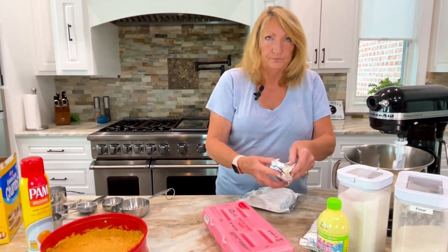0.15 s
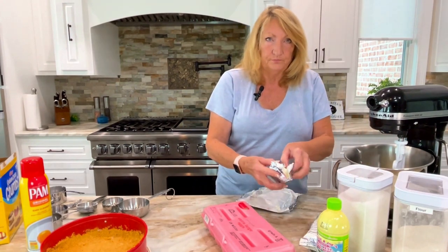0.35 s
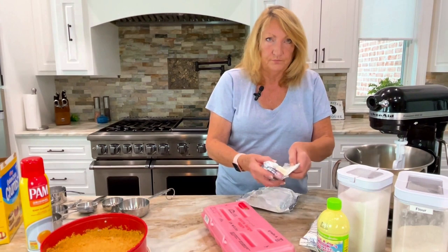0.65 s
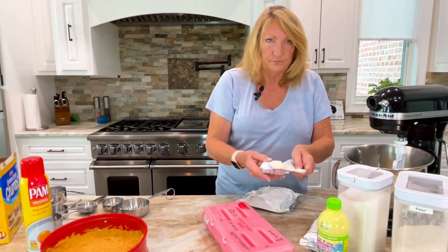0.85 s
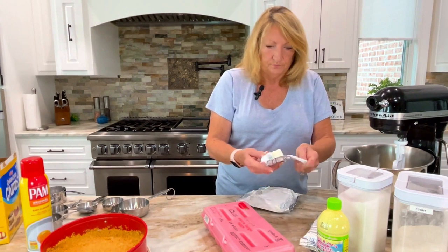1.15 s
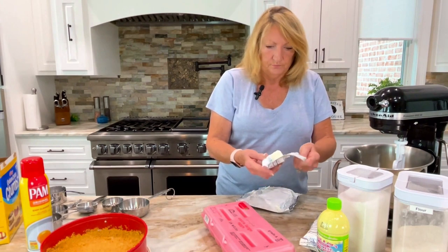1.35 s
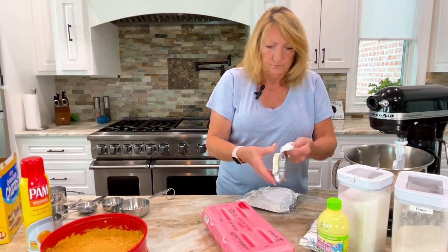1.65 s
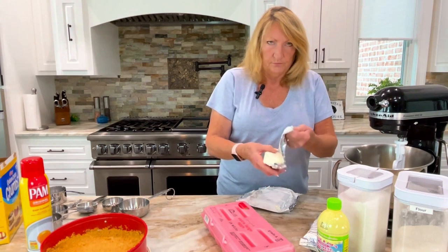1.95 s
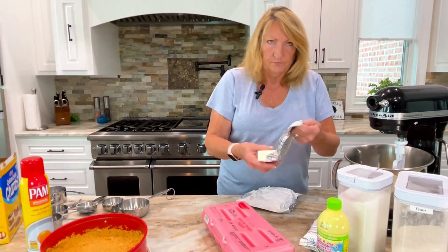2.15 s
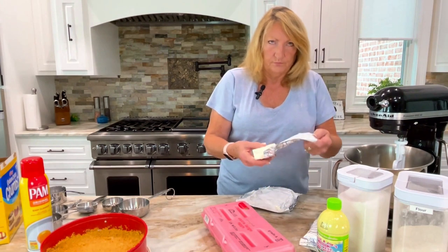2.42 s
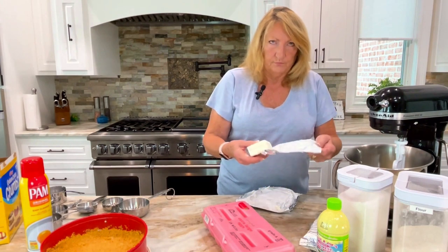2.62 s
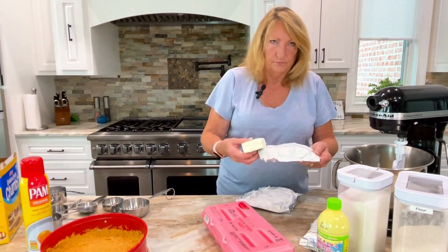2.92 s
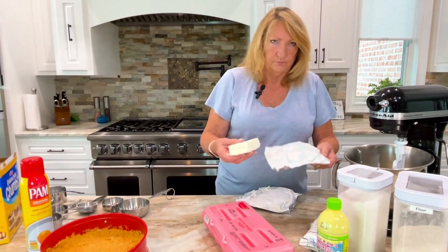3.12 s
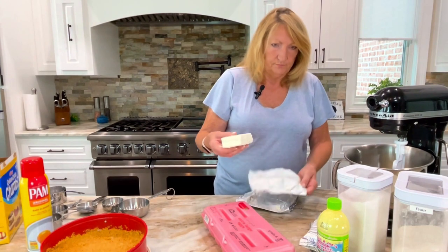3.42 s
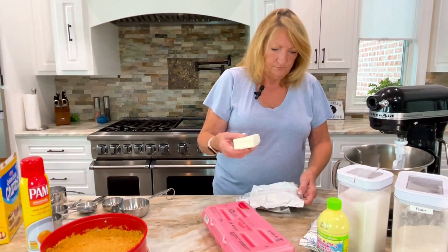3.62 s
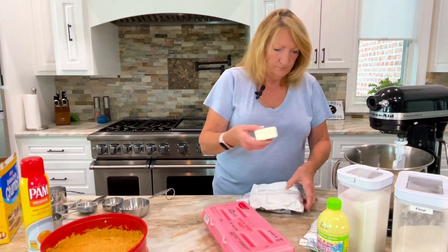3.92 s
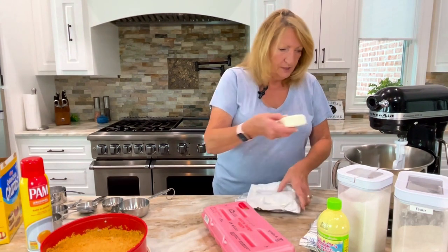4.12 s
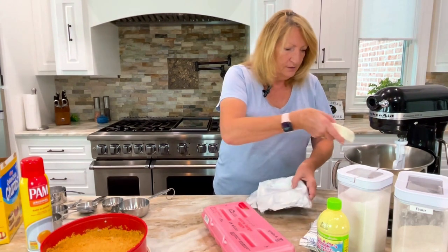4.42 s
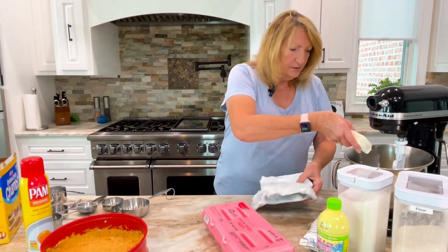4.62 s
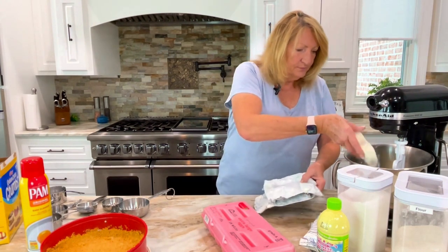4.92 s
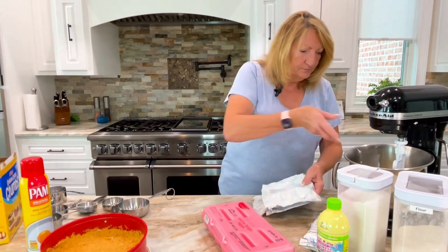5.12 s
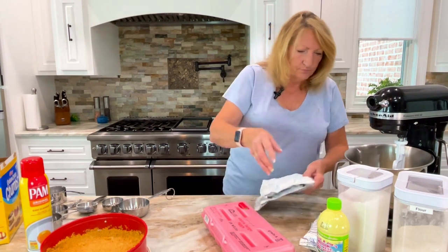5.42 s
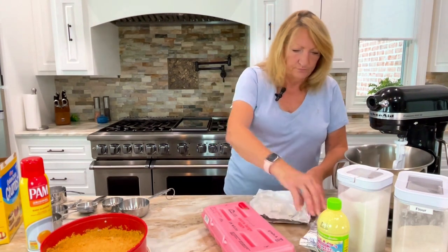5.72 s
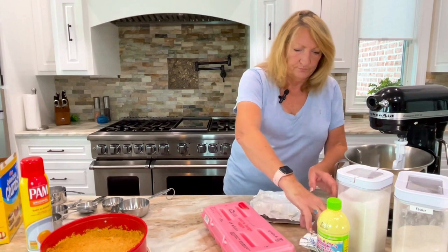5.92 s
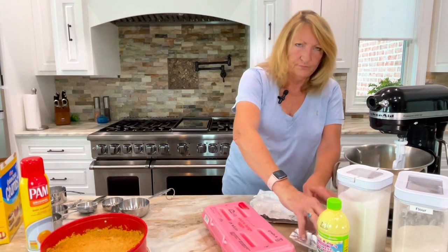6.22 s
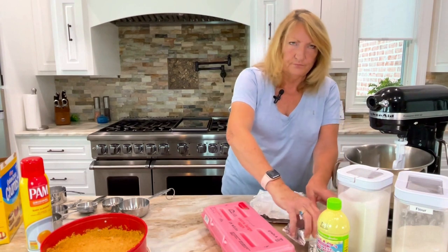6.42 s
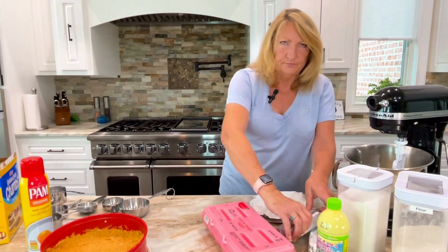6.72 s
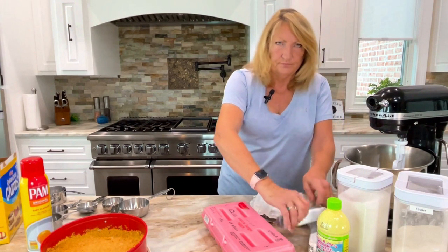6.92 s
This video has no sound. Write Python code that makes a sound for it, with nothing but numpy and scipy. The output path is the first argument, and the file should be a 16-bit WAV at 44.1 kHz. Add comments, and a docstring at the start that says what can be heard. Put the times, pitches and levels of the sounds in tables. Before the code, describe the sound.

Foil wrapper crinkles and snaps as it is peeled off a butter block, pressed onto a counter, then a second wrapped block is picked at.

```python
"""A foil wrapper is peeled off a block of butter in a quiet kitchen: the sheet buckles in distinct snaps, bursts
of filtered noise, while each stroke of the hands raises a rustle of tiny creases. Scrapes are gliding narrow-band
noise; popping facets and soft bumps are damped tones. The foil is pressed onto the counter, the butter drops
into a bowl as a decaying noise slap, then fingers pick at a second, tightly wrapped block.
Behind it lie a short diffuse reverberation, still air and a faint mains hum."""
import sys
import numpy as np
from scipy import signal
from scipy.fft import rfft, irfft, next_fast_len
from scipy.io import wavfile
from scipy.ndimage import uniform_filter1d, map_coordinates

SR = 44100
rng = np.random.default_rng(int(sys.argv[2]) if len(sys.argv) > 2 else 0)


def log_audio(samples):
    """Write samples as a 16-bit WAV file to the path given in sys.argv[1]."""
    # one column per channel
    frames = np.atleast_2d(samples).T
    # limit to full scale, then quantise
    limited = np.clip(frames, -1, 1)
    pcm = np.round(limited * 32767).astype(np.int16)
    wavfile.write(sys.argv[1], SR, pcm)


N = 311415
SIZE = 2048  # samples in one response of the foil or bowl


def amp(db):
    """Decibel law: level to amplitude ratio."""
    return 10 ** (np.asarray(db) / 20)


def unit(x):
    """Normalisation to an rms of 1."""
    return x / np.sqrt(np.mean(x ** 2) + 1e-20)


def along(points, hz):
    """Logarithmic frequency scale: interpolates (frequency, value) points along it."""
    f, v = np.transpose(points)
    return np.interp(np.log(hz + 1), np.log(f + 1), v)


def filtered(x, response):
    """Linear filtering: multiplies the spectrum of x by a response of frequency."""
    m = next_fast_len(N + SR // 2)
    return irfft(rfft(x, m) * response(np.fft.rfftfreq(m, 1 / SR)), m)[:N]


def causal(gain):
    """Minimum phase: folding the cepstrum gives the causal response with this gain."""
    cepstrum = irfft(np.log(np.maximum(gain, 1e-6)))
    cepstrum[1:SIZE // 2] *= 2
    cepstrum[SIZE // 2 + 1:] = 0
    return np.exp(rfft(cepstrum))


def add(track, start, sound):
    """Superposition: mixes a sound in at a sample index."""
    part = track[start:start + len(sound)]
    part += sound[:len(part)]


# spectral shape of still air: pitch_hz, gain_db (only the shape matters)
AIR_COLOUR = [(25, -8.5), (130, -2), (400, -3), (800, -9.5), (1600, -16.5), (3400, -24), (15000, -22)]


def room_tone(air_db=-69.5, hum_db=-82, hum_hz=120):
    """Stationary noise and a steady tone: still air and the mains hum of an appliance."""
    air = unit(filtered(rng.standard_normal(N), lambda hz: amp(along(AIR_COLOUR, hz))))
    hum = unit(np.sin(2 * np.pi * hum_hz * np.arange(N) / SR))
    return amp(air_db) * air + amp(hum_db) * hum


# reverberation time of the kitchen: pitch_hz, t60_s
KITCHEN_DECAY = [(200, 0.86), (1500, 0.27), (5000, 0.074), (14000, 0.091)]


def kitchen(x, delay_s=0.0046):
    """Diffuse reverberation: cupboards and stone answer with a noise tail, each pitch decaying at its own rate."""
    hz, t, z = signal.stft(rng.standard_normal(SR // 2), SR, nperseg=256)
    decay = np.exp(-np.log(1000) * t / along(KITCHEN_DECAY, hz)[:, None])
    tail = signal.istft(z * decay, SR, nperseg=256)[1]
    delayed = np.pad(x, (int(delay_s * SR), 0))
    return signal.fftconvolve(delayed, tail / np.linalg.norm(tail))[:N]


def rings(table, rise_cycles):
    """Damped free vibration: one decaying sine for each row, with a rise set in cycles."""
    out, t = np.zeros(N), np.arange(SR // 4) / SR
    for s, hz, db, t60 in table:
        decay = 1000 ** (-t / t60)
        rise = 1 - np.exp(-t * hz / rise_cycles)
        add(out, round(s * SR), amp(db) * decay * np.sin(2 * np.pi * hz * t) * rise)
    return out


# soft low bumps of hands and arms: start_s, pitch_hz, level_db (amplitude before rise and decay), t60_s
HAND_BUMPS = [(2.335, 36.6, -56, 0.13), (2.715, 90.5, -42, 0.035), (5.795, 60, -60, .2)]


def bumps():
    """Low-frequency free vibration: hands and arms sound as soft damped tones."""
    return rings(HAND_BUMPS, rise_cycles=0.37)


# the butter lands and topples in the bowl: start_s, level_db (initial rms of the slap)
BUTTER_DROPS = [(5.079, -39), (5.13, -58)]
# spectral shape of butter in the bowl: pitch_hz, gain_db (only the shape matters)
BOWL_COLOUR = [(70, -15), (250, -3), (700, 1), (1070, 2), (1300, -7), (2000, -5), (2800, -23), (8000, -19),
               (15000, -43)]


def butter(t60=0.12):
    """Damped impact: the soft block lands with a dull, quickly decaying slap of noise."""
    out, t = np.zeros(N), np.arange(SR // 4) / SR
    body = irfft(causal(amp(along(BOWL_COLOUR, np.fft.rfftfreq(SIZE, 1 / SR)))))
    for s, db in BUTTER_DROPS:
        slap = rng.standard_normal(len(t)) * np.exp(-np.log(1000) * t / t60)
        add(out, round(s * SR), amp(db) * signal.fftconvolve(slap, body / np.linalg.norm(body)))
    return out


# taut facets that pop through, broad ones low and hollow, small ones high:
# start_s, pitch_hz, level_db (amplitude before rise and decay), t60_s
FACET_POPS = [(0.932, 580, -30, 0.022), (0.978, 610, -32, 0.014), (1.136, 510, -33, 0.017),
              (1.15, 510, -30, 0.025), (1.171, 584, -33, 0.018), (1.276, 480, -28.5, 0.015),
              (1.432, 323, -34, 0.011), (1.453, 394, -31, 0.019), (1.596, 1360, -33, 0.012),
              (2.1873, 2060, -23, 0.01), (2.315, 2210, -38.5, 0.015), (2.452, 2170, -38, 0.013),
              (2.996, 1160, -33.5, 0.02), (3.036, 2040, -30.5, 0.0055), (3.473, 4300, -49, .008),
              (4.282, 5470, -28, 0.0074), (4.302, 2560, -15, 0.0039), (6.466, 2760, -37, 0.02),
              (6.483, 1770, -29, 0.007), (6.621, 2050, -37, 0.02)]


def pops():
    """Snap-through instability: taut facets pop through and ring as damped tones."""
    return rings(FACET_POPS, rise_cycles=0.56)


# the sheet drags off the butter, low and hollow, then its edge scrapes over the counter:
# start_s, end_s, start_pitch_hz, end_pitch_hz, level_db (rms)
FOIL_SCRAPES = [(0.822, 1.014, 660, 620, -47), (1.337, 1.505, 418, 384, -54),
                (4.162, 4.287, 999, 1335, -46.5), (4.262, 4.416, 3660, 6270, -53.5),
                (4.556, 4.623, 1750, 1510, -52), (5.66, 5.766, 1000, 993, -53.5)]


def scrapes(width_hz=85, width_share=0.11):
    """Friction-driven resonance: one mode of the sheet glides as its free part changes length."""
    out = np.zeros(N)
    for start, end, start_hz, end_hz, db in FOIL_SCRAPES:
        u = np.linspace(0, 1, int((end - start) * SR))
        cycles = np.cumsum(start_hz + (end_hz - start_hz) * u) / SR
        # slow complex noise around the gliding pitch widens it into a band
        place = 2 * (width_hz * (end - start) * u + width_share * cycles)
        grit = sum(phase * map_coordinates(rng.standard_normal(SIZE), [place]) for phase in (1, 1j))
        scrape = (grit * np.exp(2j * np.pi * cycles)).real * np.sin(np.pi * u)
        add(out, round(start * SR), amp(db) * unit(scrape))
    return out


# spectral shapes of foil on the block, on the counter and tightly wrapped: pitch_hz, gain_db
ON_BLOCK = [(170, -19), (300, -8.5), (480, -0.5), (720, 0.5), (930, -6.5), (1250, -1), (2000, -3),
            (4300, -8.5), (7000, -17)]
ON_COUNTER = [(200, -19.5), (480, -4.5), (1000, 0), (1420, -5), (2100, -2.5), (3400, -10.5), (4200, -6),
              (7000, -14)]
TIGHT = [(200, 3.7), (700, 15.4), (2000, 10), (3400, 6.8), (7000, 4.3)]
# ways of holding the foil: start_s, colour (one of the shapes above), sliding_db (against the creases)
GRIPS = [(0, ON_BLOCK, -6), (3.301, ON_COUNTER, 3), (4.8, ON_COUNTER, 1), (6.0, TIGHT, -4)]


def grip_at(s):
    """Boundary conditions: which way the foil is held at these times."""
    return np.searchsorted([grip[0] for grip in GRIPS[1:]], s)


# treble colour of the microphone, added to the foil's held gain at the first pitch: pitch_hz, gain_db
MICROPHONE_TREBLE = [(7000, -2.5), (8300, 3), (9200, -9.5), (10500, -10), (12500, -6), (14300, -4.5),
                     (16000, -10.5)]


def foil_colour(spectrum, zone):
    """Band-pass filtering: one band of the foil's spectral shape with the microphone's treble colour."""
    hz = np.fft.rfftfreq(SIZE, 1 / SR) + 1
    band = 1 / np.sqrt((1 + (zone[0] / hz) ** 10) * (1 + (hz / zone[1]) ** 10))
    foil_db = along(spectrum, np.minimum(hz, MICROPHONE_TREBLE[0][0]))
    return causal(band * amp(foil_db + along(MICROPHONE_TREBLE, hz)))


# flex, crack and fizz bands of the foil: low_hz, high_hz
FOIL_BANDS = [(165, 1100), (1100, 4500), (4500, 17000)]


def foil_colours():
    """Spectral division: the flex, crack and fizz responses for each way of holding the foil."""
    return [[foil_colour(grip[1], zone) for zone in FOIL_BANDS] for grip in GRIPS]


def band_levels(db, brightness_db, bands_db, far_share=0.33, crack_share=0.1):
    """Spectral tilt: brightness tips flex against fizz, lifts the crack and cuts the opposite band further."""
    tip = brightness_db * np.array([-1, 0, 1])
    crack = crack_share * abs(brightness_db) * np.array([0, 1, 0])
    return db + tip + far_share * np.minimum(tip, 0) + crack + np.array(bands_db)


def folds(x, depth_db=4, width_hz=520, life_s=.011):
    """Time-varying resonance: the folds keep changing shape, so each moment favours different pitches."""
    hz, t, z = signal.stft(x, SR, nperseg=256)
    place = np.meshgrid(hz / width_hz, t / life_s, indexing="ij")
    field = map_coordinates(rng.standard_normal((SIZE // 16, SIZE)), place, mode="mirror")
    return signal.istft(z * unit(amp(depth_db * field)), SR, nperseg=256)[1][:N]


# each pull, fold or press of the hands: start_s, length_s, level_db (before the band offsets and the mix),
# brightness_db (high for a tight pinch, low for a loose bend)
HAND_STROKES = [(-0.015, 0.089, -61.5, 0), (0.12, 0.24, -74, -2), (0.361, 0.086, -60.5, 0),
                (0.512, 0.097, -54.5, 1), (0.628, 0.18, -59.5, -4.5), (0.785, 0.12, -53.5, -9),
                (0.85, 0.11, -48.5, 2), (1.03, 0.032, -55, -8.5), (1.12, 0.11, -63.5, -2.5),
                (1.324, 0.27, -49.5, -2.5), (1.488, 0.019, -45.5, 0.5), (1.564, 0.2, -56, -6),
                (1.812, 0.079, -72, 8.5), (1.9, 0.12, -65, -6.5), (2, 0.13, -57.5, -5),
                (2.15, 0.14, -69.5, -0.5), (2.403, 0.13, -61.5, -5.5), (2.558, 0.15, -62, -2.5),
                (2.63, 0.096, -52, -5), (2.784, 0.019, -50, -5.5), (2.84, 0.15, -66, 0.5),
                (2.999, 0.45, -76.5, -7), (3.22, 0.041, -86, -2), (3.44, 0.016, -75, 8),
                (3.514, 0.041, -56, -1), (3.587, 0.11, -69, -5), (3.777, 0.14, -75.5, -7.5),
                (4.139, 0.17, -49, -2.5), (4.3, 0.12, -57, 2.5), (4.419, 0.25, -57, -2),
                (4.825, 0.073, -60, -4.5), (4.92, 0.091, -73, -1), (5.044, 0.094, -62.5, -1.5),
                (5.182, 0.156, -57, -3.5), (5.33, 0.072, -58.5, -3), (5.427, 0.19, -55, -2),
                (5.626, 0.16, -58, -2), (6.151, 0.14, -59.5, 0.5), (6.31, 0.1, -58.5, -1),
                (6.385, 0.039, -64.5, 2), (6.447, 0.035, -57, 0.5), (6.52, 0.15, -63, 0.5),
                (6.72, 0.13, -59, 0.5), (6.837, 0.093, -60, 1), (6.983, 0.017, -48, 2.5)]
# offsets of an ordinary stroke: flex_db, crack_db, fizz_db
STROKE_BANDS = [-2.5, 0.63, 2]
# decay time constants of the creep after a stroke: flex_s, crack_s, fizz_s
SETTLE_TIMES = [0.11, 0.18, 0.18]


def handling(attack_s=0.044, release_s=0.029, settle_db=-10):
    """Viscoelastic relaxation: fingers take up the strain, hold and let go, then the sheet creeps back."""
    t = np.arange(0, N / SR, .001)
    power = np.zeros((len(FOIL_BANDS), len(t)))
    for start, length, db, brightness_db in HAND_STROKES:
        after = np.maximum(t - start - length, 0)
        creep = amp(settle_db) * np.exp(-after / np.array(SETTLE_TIMES)[:, None])
        shape = np.clip((t - start) / attack_s, 0, 1) * (np.exp(-after / release_s) + creep)
        power += (amp(band_levels(db, brightness_db, STROKE_BANDS))[:, None] * shape) ** 2
    return [np.interp(np.arange(N) / SR, t, np.sqrt(band)) for band in power]


def rustle(colours, per_second=260, spread_db=14, own_db=3, life_s=0.0013, even_s=0.028):
    """Crackling noise: tiny creases of unequal size, each a fresh burst, over the smooth sliding of the foil."""
    out, t = np.zeros(N), np.arange(N) / SR
    # a crease can only store so much strain, so the sizes are bounded
    creases = (rng.random(N) < per_second / SR) * amp(-spread_db * rng.random(N))
    grip = grip_at(t)
    sliding = amp([row[2] for row in GRIPS])[grip]
    for zone, strength in enumerate(handling()):
        bursts = (creases * amp(own_db * rng.standard_normal(N))) ** 2
        power = signal.lfilter([1], [1, -np.exp(-2 / (life_s * SR))], bursts)
        power = power / power.mean() + sliding ** 2
        # the hands feed in strain steadily, so a big crease leaves less for its neighbours
        power = power / uniform_filter1d(power, int(even_s * SR))
        drive = np.sqrt(np.abs(power)) * rng.standard_normal(N) * strength
        for k, colour in enumerate(colours):
            sheet = irfft(colour[zone])
            out += signal.oaconvolve(drive * (grip == k), sheet / np.linalg.norm(sheet))[:N]
    return folds(out)


def buckle(colour, build, life, lead_s, facet_db=4.5, facet_hz=400, slip_db=0.5):
    """Avalanche dynamics: uneven slips swell and die; facets ring at their own pitches. Energy 1."""
    t = np.arange(SIZE) / SR - lead_s
    sizes = amp(slip_db * np.repeat(rng.standard_normal(SIZE // 32), 32))
    slips = sizes * rng.standard_normal(SIZE) * np.exp(-np.logaddexp(-t / build, t / life))
    place = np.fft.rfftfreq(SIZE, 1 / SR) / facet_hz
    facets = map_coordinates(rng.standard_normal(SIZE // 2), [place], mode="mirror")
    ring = irfft(rfft(slips) * colour * causal(amp(facet_db * facets)))
    return ring / np.linalg.norm(ring)


# the distinct buckles: peak_s (about the height of the swell), level_db (rms over snap_s, before the band
# offsets), brightness_db (fizz up and flex down, high for a small facet)
FOIL_SNAPS = [(0.0502, -72, 1), (0.0892, -52.5, 0.5), (0.1096, -55, 5.5), (0.228, -71.5, 11),
              (0.3065, -67, 7), (0.392, -57.5, 7.5), (0.445, -59, 7), (0.534, -61.5, 15),
              (0.5505, -47, 9.5), (0.5612, -53, 12), (0.5785, -45, 1), (0.6038, -51, 7.5),
              (0.6273, -49.5, 2), (0.694, -52, -0.5), (0.7178, -58, -1), (0.7622, -51, -4),
              (0.8128, -49, 5.5), (0.8419, -44, 3.5), (0.8867, -44, 5.5), (0.9058, -44, -3),
              (0.921, -52, 7), (0.9313, -48, -6), (0.943, -45, -7), (0.969, -45.5, -1),
              (0.9779, -41.5, -5.5), (0.9919, -47.5, 5.5), (1.0194, -51, 3.5), (1.071, -54, 8.5),
              (1.1093, -56, 5.5), (1.137, -55.0, -3), (1.1541, -47, -7.5), (1.1726, -57, -11),
              (1.1864, -50, -3), (1.2226, -50.5, -7.5), (1.2756, -49.0, -7.5), (1.328, -58.5, -16),
              (1.353, -44, 3), (1.3678, -44.5, -7), (1.3853, -45.5, 7.5), (1.4004, -47, 2.5),
              (1.4317, -44.5, -5.5), (1.4547, -43, -4), (1.4775, -53.0, -1), (1.4858, -42.5, -3),
              (1.4939, -46.5, 0), (1.5399, -48.0, -2), (1.5515, -49.5, -6), (1.5956, -52, 6.5),
              (1.6174, -51.5, 7), (1.6443, -46.5, 0.5), (1.6627, -46, -1), (1.6851, -49.5, -6.5),
              (1.711, -49, -8), (1.7235, -50, -6), (1.7388, -47, -1.5), (1.7585, -50.5, 2),
              (1.785, -53, 1.5), (1.8341, -49.5, -5), (1.896, -55, -3.5), (1.9246, -58.5, 10.5),
              (1.943, -61.5, 6), (2.055, -57.5, -7), (2.0923, -45.5, -3.5), (2.115, -54.5, 2),
              (2.131, -48.5, -3.5), (2.1609, -47.5, 1), (2.1878, -52.5, 3), (2.2236, -61.5, 9),
              (2.267, -68, 10), (2.3165, -53.5, 3), (2.3972, -57, -7.5), (2.4282, -49, -9.5),
              (2.4768, -51.5, -5.5), (2.5943, -46.5, 0.5), (2.6133, -58, -4), (2.6595, -45.5, -6.5),
              (2.7157, -39.5, 0), (2.7462, -47.5, -2), (2.815, -46.0, -2), (2.9545, -53, 0.5),
              (2.997, -56, -10.5), (3.0365, -58.5, -8.5), (3.235, -67, -1), (3.2698, -60, -1),
              (3.529, -51, -7.5), (3.5411, -46, 2.5), (3.6072, -54.5, -3), (3.654, -59.5, 2.5),
              (3.788, -65.5, -6), (3.8356, -65.5, -4.5), (4.1404, -58.5, -2), (4.1696, -47, -3.5),
              (4.2175, -48, -1), (4.2506, -47, -4.5), (4.2813, -56, 8), (4.3025, -45.5, -0.5),
              (4.3596, -48, -7), (4.4927, -54.5, -6), (4.523, -49, 3.5), (4.553, -47.5, 4),
              (4.5944, -52, -9.5), (4.6471, -49.5, -3), (4.6731, -43, -3.5), (4.7105, -52.0, 1),
              (4.731, -60, 14.5), (4.8364, -56, 0.5), (4.9146, -60, -4), (5.2196, -43.5, 0.5),
              (5.2406, -53.5, -6.5), (5.295, -42, -6.5), (5.3288, -50, -3.5), (5.3896, -51, -1),
              (5.4253, -47.5, -7), (5.4802, -55.5, 10.5), (5.4951, -39.5, -2), (5.516, -50.5, -11),
              (5.5499, -44.5, -5), (5.6, -40.5, -2.5), (5.6079, -44.5, -2), (5.6855, -51, -3),
              (5.6972, -46.5, 1.5), (5.733, -49, -5.5), (5.7766, -49, -7), (6.1293, -59, -2.5),
              (6.206, -60, 14), (6.2222, -51.5, 7.5), (6.2492, -50, 6.5), (6.3555, -53, 5.5),
              (6.4095, -46.5, 0.5), (6.4183, -48, 3.5), (6.467, -49.5, -1), (6.4831, -50.5, 0.5),
              (6.5644, -51.0, 8.5), (6.6723, -54.5, 2), (6.7282, -59.5, 9.5), (6.7414, -54.5, -4.5),
              (6.799, -51.5, 5.5), (6.85, -53.5, 2), (6.876, -62.5, 19), (6.8844, -53.5, 13.5),
              (6.8992, -49.5, 15.5), (7.0125, -46, 10), (7.0215, -55, 14), (7.0305, -48.5, 13.5),
              (7.0529, -57.5, 20)]
# offsets of a buckle of middling size: flex_db, crack_db, fizz_db
SNAP_BANDS = [-3.5, -0.5, -1]


def snaps(colours, flex_life=1.28, lead_s=.005, snap_s=.008, usual_s=0.0036, length_spread_db=3,
          build_share=0.25, decay_share=0.67):
    """Elastic buckling: each event flexes the whole sheet, cracks and fizzes; the flexing lasts longest."""
    out = np.zeros(N)
    for peak_s, level_db, brightness_db in FOIL_SNAPS:
        length = usual_s * amp(length_spread_db * rng.standard_normal())
        levels = band_levels(level_db, brightness_db, SNAP_BANDS)
        for db, colour, stretch in zip(levels, colours[grip_at(peak_s)], (flex_life, 1, 1)):
            snap = buckle(colour, build_share * length, stretch * decay_share * length, lead_s)
            add(out, round((peak_s - lead_s) * SR), amp(db) * np.sqrt(snap_s * SR) * snap)
    return out


def scene(rustle_db=-3.0, wet_db=-15):
    """Superposition of direct and reverberant sound: wrapper, butter and hands in the kitchen."""
    colours = foil_colours()
    foil = snaps(colours) + amp(rustle_db) * rustle(colours) + scrapes() + pops()
    near = foil + butter() + bumps()
    return (near + amp(wet_db) * kitchen(near) + room_tone())[None]


def record(dry, top_hz=15850):
    """Band limitation: a very steep low-pass removes what lies above top_hz."""
    return filtered(dry[0], lambda hz: 1 / np.sqrt(1 + (hz / top_hz) ** 300))[None]


dry = scene()
out = record(dry)
log_audio(out)
```